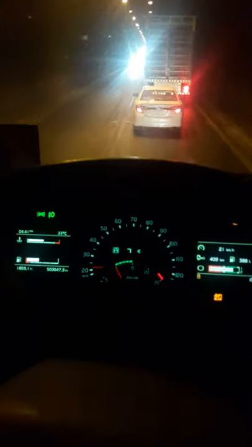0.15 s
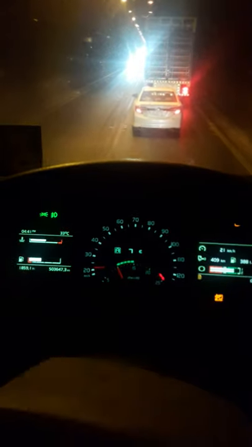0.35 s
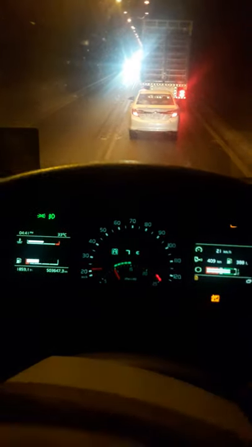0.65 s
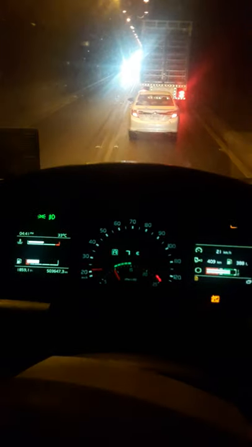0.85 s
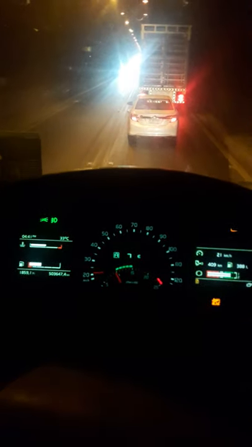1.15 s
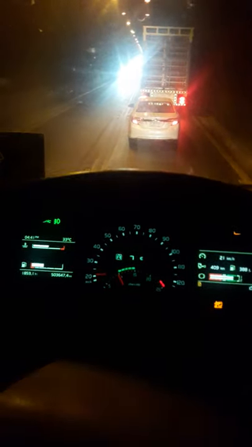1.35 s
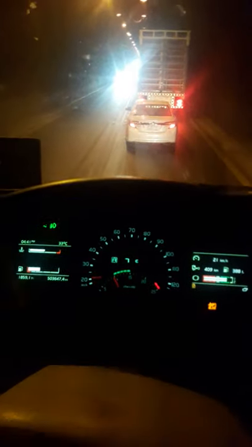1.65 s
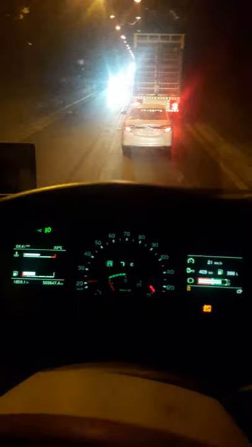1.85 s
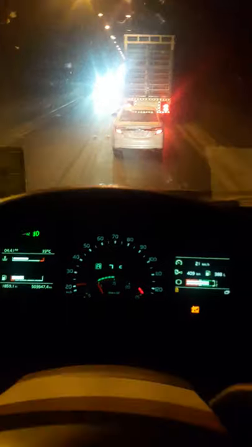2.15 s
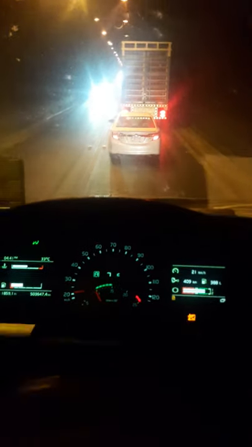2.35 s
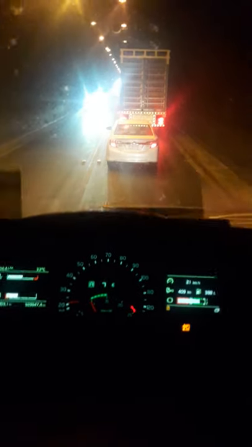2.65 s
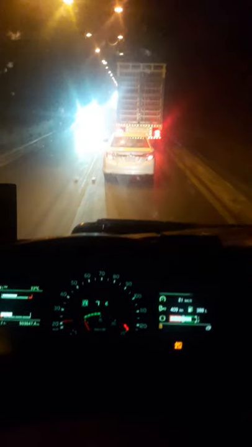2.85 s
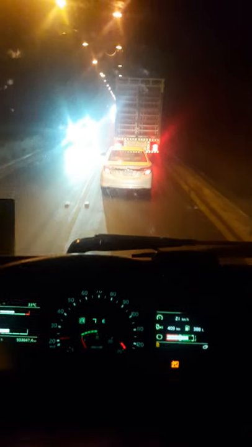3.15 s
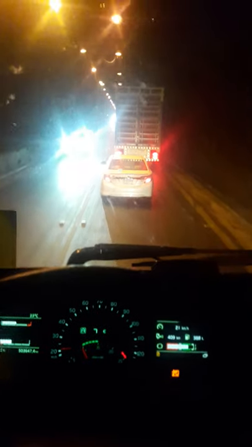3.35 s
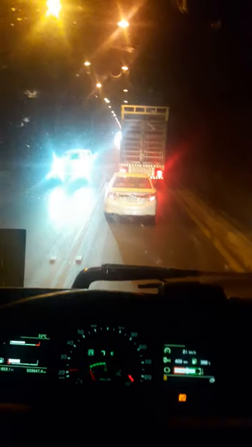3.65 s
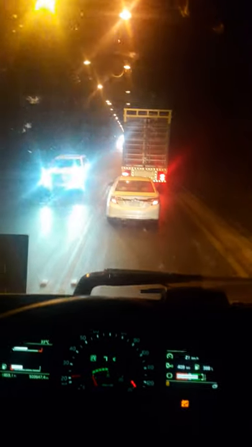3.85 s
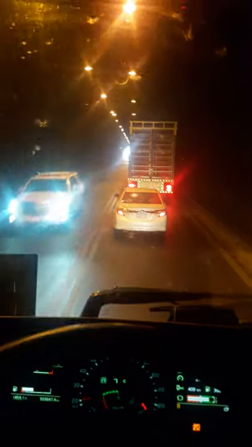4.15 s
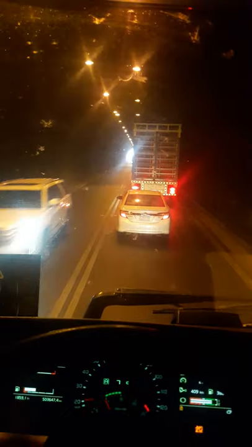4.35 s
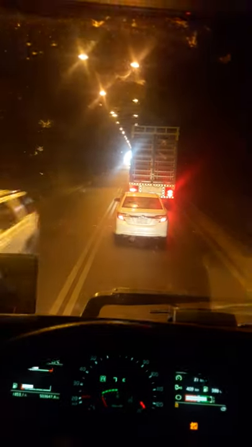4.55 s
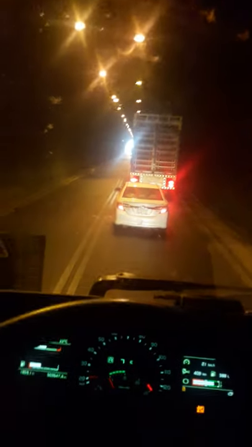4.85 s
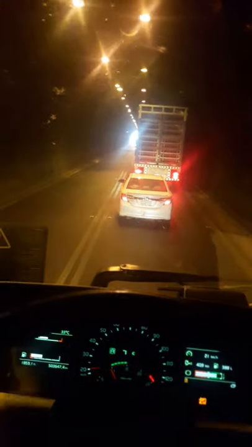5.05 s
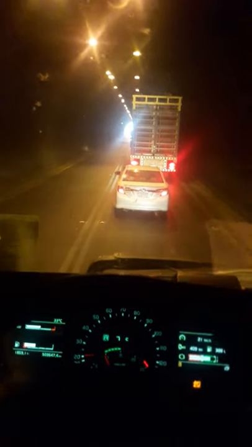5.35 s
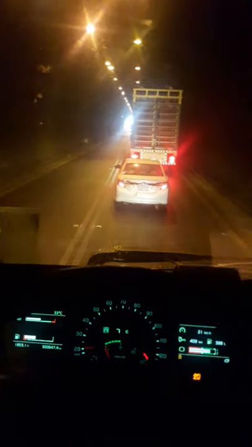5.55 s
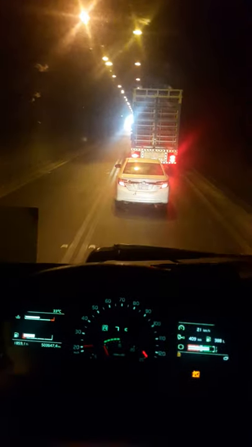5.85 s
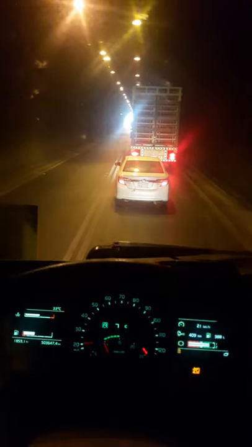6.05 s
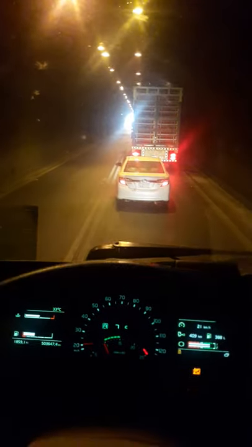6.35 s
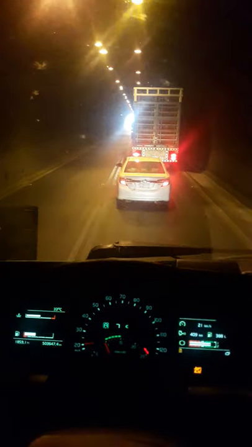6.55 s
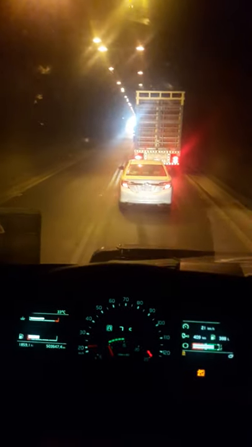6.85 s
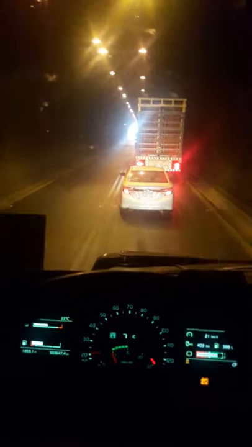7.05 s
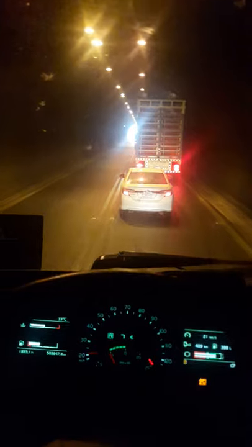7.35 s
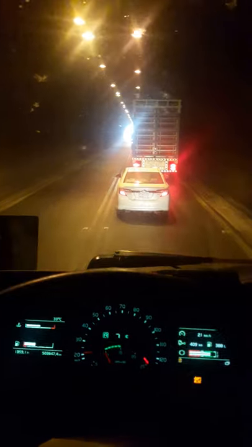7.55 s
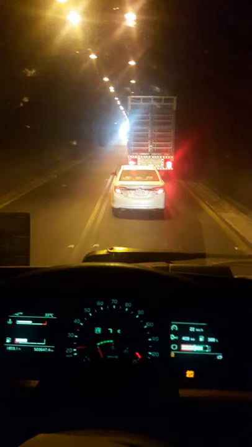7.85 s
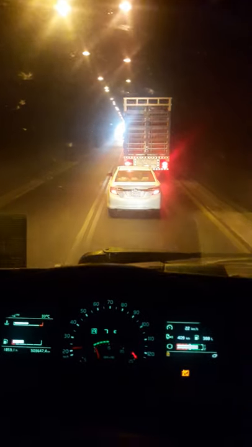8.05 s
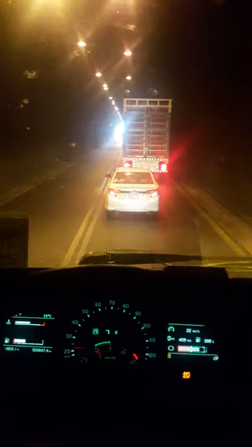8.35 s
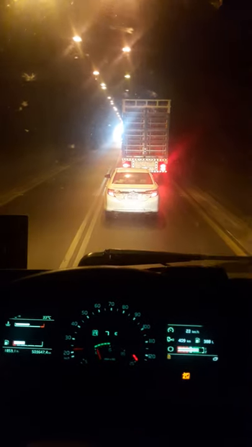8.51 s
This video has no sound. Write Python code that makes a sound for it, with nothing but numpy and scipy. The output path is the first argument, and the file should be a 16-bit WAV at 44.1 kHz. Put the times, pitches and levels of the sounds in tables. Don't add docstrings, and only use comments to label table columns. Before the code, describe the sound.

Deep heavy truck engine hum with road rumble and soft air hiss in the cab, briefly quieter on smooth road, then revving up.

```python
import sys
import numpy as np
from scipy import signal
from scipy.fft import rfft, irfft, next_fast_len
from scipy.io import wavfile
from scipy.ndimage import uniform_filter1d

SR = 44100
rng = np.random.default_rng(int(sys.argv[2]) if len(sys.argv) > 2 else 0)


def amplitude_ratio(level_db):
    exponent = np.asarray(level_db, float) / 20
    return 10 ** exponent


def generate_wav(signal):
    frames = np.transpose(np.atleast_2d(signal))
    scaled = np.clip(frames, -1, 1) * 32767
    pcm = np.round(scaled).astype(np.int16)
    wavfile.write(sys.argv[1], SR, pcm)


N = 382788
T = np.arange(N) / SR
SIZE = next_fast_len(N)
HZ = np.maximum(np.arange(SIZE // 2 + 1) * SR / SIZE, 1)

SMOOTH_FROM_S, SMOOTH_TO_S, DROP_S, RETURN_S = 6.07, 7.35, .005, .035
SMOOTH_DB = -9
TONES_FEEL = 0.94
GEARED_FEELS = 0.83


def level(x, db):
    return x * amplitude_ratio(db) / np.sqrt(np.mean(x ** 2))


def curves(*tables):
    s, *columns = np.vstack(tables).T
    return [np.interp(T, s, column) for column in columns]


def over_hz(table, hz):
    at, value = np.transpose(table)
    return np.interp(np.log(hz), np.log(at), value)


def humps(modes):
    return sum(db / (1 + (2 * (HZ - hz) / width) ** 2) for hz, width, db in modes)


def walk(rate):
    hold = int(SR / rate)
    steps = np.repeat(rng.standard_normal(N // hold + 1), hold)
    return 1.344 * uniform_filter1d(uniform_filter1d(steps, hold), hold)[:N]


def ramp(at_s, length_s):
    return np.clip((T - at_s) / length_s + .5, 0, 1)


def swell(at_s, length_s, db):
    return db * np.exp(-((T - at_s) / length_s) ** 2)


def smooth():
    return ramp(SMOOTH_FROM_S, DROP_S) - ramp(SMOOTH_TO_S, RETURN_S)


def surface_db():
    since = T - SMOOTH_FROM_S
    joint = 1 * np.exp(np.minimum(since, 0) / .05) * (since < 0)
    hang = -18 * np.exp(-np.maximum(since, 0) / .1)
    coarse_patch = swell(2.6, 1.7, 2)
    rougher_after = 1.6 * ramp(SMOOTH_TO_S, RETURN_S)
    return -28.3 + coarse_patch + joint + smooth() * (SMOOTH_DB + hang) + rougher_after


def ports(mid, side, hz):
    # (frequency [Hz], left-right correlation [-1 to 1])
    likeness = [(60, 0.78), (100, 0.88), (180, 0.88), (300, 0.8), (520, 0.57), (890, 0.32), (1520, -0.42),
                (2600, 0.24)]
    # (frequency [Hz], left minus right [dB])
    balance = [(60, -5.5), (91, -3.5), (140, -0.5), (210, -5.5), (320, -3), (490, -2), (740, -2),
               (1130, -2.5), (1710, -5.5), (2600, 0.5)]
    like = np.clip(over_hz(likeness + [(3500, -.12), (5000, -0.042)], hz), -.95, .999)
    lean = over_hz(balance + [(5000, -1.5), (9000, 1.7), (14000, .7)], hz) / 2
    shared = np.sqrt((1 + like) / 2) * mid
    differing = np.sqrt((1 - like) / 2) * side
    return np.array([(shared + differing) * amplitude_ratio(lean), (shared - differing) * amplitude_ratio(-lean)])


def airy(shape_db, top_hz, swell_db, flicker_db):
    white = rfft(rng.standard_normal((2, SIZE)))
    both = ports(white[0], white[1], HZ) * amplitude_ratio(shape_db)
    together = swell_db * walk(0.98)
    out = 0
    for centre in np.arange(9, 2 * np.log2(top_hz) + 1):
        window = np.cos(np.pi / 2 * np.clip(2 * np.log2(HZ) - centre, -1, 1)) ** 2
        band = irfft(both * window, SIZE)[:, :N]
        out = out + band * amplitude_ratio(together + flicker_db * walk(12))
    return out


def tone(hz, db, wobble_db, blur):
    phase = 2 * np.pi * np.cumsum(hz) / SR + blur * walk(9) + rng.uniform(0, 2 * np.pi)
    size = np.sqrt(2) * amplitude_ratio(db + wobble_db * walk(12))
    return ports(size * np.sin(phase), .3 * size * np.cos(phase), np.median(hz))


def breath(hz, db, width_hz, flicker_db):
    lowpass = signal.butter(2, width_hz / 2, fs=SR, output="sos")
    slow = signal.sosfilt(lowpass, rng.standard_normal((2, 2, N)))
    phase = 2 * np.pi * np.cumsum(hz) / SR
    band = slow[0] * np.sin(phase) + slow[1] * np.cos(phase)
    mid, side = level(band, 0) * amplitude_ratio(db + flicker_db * walk(6.2))
    return ports(mid, side, np.median(hz))


def rattles(events, lo_hz, hi_hz, knocks_s, decay_s):
    out = np.zeros((2, N + SR))
    t = np.arange(SR // 8) / SR
    shape = sum((t >= k) * np.exp(-np.maximum(t - k, 0) / decay_s) for k in knocks_s)
    band = signal.butter(2, [lo_hz, hi_hz], "band", fs=SR, output="sos")
    for (s, db, pan_db), noise in zip(events, rng.standard_normal((len(events), 2, len(t)))):
        burst = level(signal.sosfilt(band, noise), db) * shape
        start = int(s * SR)
        out[:, start:start + len(t)] += burst * amplitude_ratio(np.array([[pan_db], [-pan_db]]) / 2)
    return out[:, :N]


def engine(hz, boom_db):
    # (cycles per crank turn, level against the rumble [dB])
    orders = [(3, -20), (4.5, -15), (5, -16), (7, -15), (7.5, -15), (9, -18), (15, -20), (18, -22)]
    boom = tone(hz, boom_db + TONES_FEEL * SMOOTH_DB * smooth(), wobble_db=1.2, blur=0.18)
    frame_db = surface_db() + .6 * np.maximum(hz - 101, 0)
    return boom + sum(tone(hz * order / 6, frame_db + db, wobble_db=4.5, blur=.65) for order, db in orders)


def geared(hz, rest_db, loud_s, swell_s, swell_db, feels=GEARED_FEELS):
    drift_db = 1.5 * walk(2.479)
    db = rest_db + swell(loud_s, swell_s, swell_db) + drift_db + feels * SMOOTH_DB * smooth()
    return tone(hz * (1 + .004 * walk(1.5)), db, wobble_db=1.5, blur=0.27)


def driveline():
    # (time [s], mesh rate [Hz])
    mesh = [(0, 217.5), (1.1, 215.9), (3.1, 221.4), (5.7, 215), (7.3, 219.3), (8.3, 226.8), (8.68, 228.1)]
    # (turns against the mesh [ratio], resting level [dB], loudest time [s], swell length [s], swell [dB])
    parts = [
        (.909, -46, 4.0, 1.2, 12),
        (1, -37.5, 2.9, 1.3, 5.5),
        (1.083, -43, 3.1, 1.0, 11),
    ]
    # (time [s], pitch [Hz], level [dB])
    whine = [(.15, 1249, -66), (.3, 1255, -52), (.7, 1295, -52), (.97, 1306, -44.5), (1.32, 1292, -44),
             (1.45, 1306, -50), (1.8, 1310, -64), (2.0, 1310, -80), (8.35, 1298, -78), (8.46, 1300, -50),
             (8.68, 1300, -50)]
    mesh_hz = curves(mesh)[0]
    out = sum(geared(mesh_hz * turns, *shape) for turns, *shape in parts)
    out = out + geared(59.96 + .8 * T, rest_db=-39.5, loud_s=5.7, swell_s=0.42, swell_db=7)

    lift_s = 4.8
    axle_hz = 164.9 + 1.1 * np.minimum(T, lift_s) - 7.5 * ramp(lift_s, 0.5)
    out = out + geared(axle_hz, rest_db=-38, loud_s=4.2, swell_s=1.6, swell_db=5, feels=.3)

    panel_db = -52.5 + swell(0.91, 0.77, 6)
    out = out + breath(np.full(N, 664.6), panel_db, width_hz=25, flicker_db=2)

    hum_from_s, attack_s = 7.75, 0.17
    hum = tone(np.full(N, 98.4), -32 + 4.5 * (T - hum_from_s), wobble_db=2.5, blur=0.27)
    out = out + hum * ramp(hum_from_s + attack_s, attack_s)

    whine_hz, whine_db = curves(whine)
    core = tone(whine_hz, whine_db, wobble_db=1.1, blur=.6) * amplitude_ratio(.3)
    hoarse = breath(whine_hz, whine_db, width_hz=60, flicker_db=1.2) * amplitude_ratio(-4)
    return out + core + hoarse


def road():
    # (frequency [Hz], level per Hz [dB])
    rumble = [(15, -44), (25, -27.5), (71, -4), (97, -3), (141, -2.5), (226, -7), (418, -12.5),
              (700, -22.5), (910, -56.5), (1540, -120)]
    # (frequency [Hz], width [Hz], gain [dB])
    cab_modes = [(79.4, 25, 3), (96.7, 3.9, 6), (169, 26, 4.5), (331.6, 73, 4.5)]
    shape_db = over_hz(rumble, HZ) + humps(cab_modes)
    noise = airy(shape_db, top_hz=700, swell_db=-1.14, flicker_db=-1.0)
    return level(noise, 0) * amplitude_ratio(surface_db())


def hiss(hz):
    # (frequency [Hz], level per Hz [dB])
    spectrum = [(25, -38.5), (60, -17.5), (110, -14.5), (250, -13.5), (500, -18.5), (900, -17.5),
                (1500, -24), (2400, -31), (3250, -42.5), (3700, -46.5), (5200, -52), (7200, -59.5),
                (9900, -63), (12000, -58.5), (16000, -58.5)]
    # (frequency [Hz], width [Hz], gain [dB])
    panels = [(1037, 17, 2.5), (2680, 400, 2.5), (542, 45, 4.5), (673, 12, 3.5), (832, 58, 3),
              (2160, 460, 3.5), (8500, 230, 5), (12800, 1800, -1)]
    firing = 1 + .05 * np.sin(np.pi * np.cumsum(hz) / SR)
    air = airy(over_hz(spectrum, HZ) + humps(panels), top_hz=16000, swell_db=0.38, flicker_db=0.5)
    gust_db = swell(2.3, .7, 1.1)
    return level(air * firing, 0) * amplitude_ratio(-35.5 + 0.1038 * T + gust_db)


def turbo():
    # (time [s], boost [0-1])
    effort = [(0, 0), (1.8, .55), (2.8, .6), (3.6, .3), (5.4, .15), (6.3, .8), (6.6, .45), (7, 1),
              (7.4, .7), (8.68, .85)]
    boost = curves(effort)[0]
    hz = 4220 + 201.7 * boost
    db = -76.5 + 12.5 * boost
    strand = tone(hz * (1 + .015 * walk(6)), db - 10, wobble_db=4, blur=1.5)
    return breath(hz, db, width_hz=440, flicker_db=1.3) + strand


def clock():
    # (level [dB], left minus right [dB])
    sizes = [(-67, -2), (-61, -1), (-66, 0), (-61.5, 2), (-59.5, 2), (-57, 3), (-57.5, 3), (-58.5, 0)]
    first_s, every_s = .666, 1
    ticks = [(first_s + k * every_s, db, pan_db) for k, (db, pan_db) in enumerate(sizes)]
    return rattles(ticks, lo_hz=3950, hi_hz=4800, knocks_s=[0, .01, .02, .032], decay_s=.011)


def trim_snaps():
    # (time [s], level [dB], left minus right [dB])
    events = [
        (1.37, -72, 1),
        (3.32, -71, 0),
        (4.29, -66, 0),
        (6.09, -68, -3),
        (6.58, -71, 0),
        (7.85, -68, -1),
    ]
    return rattles(events, lo_hz=9500, hi_hz=14500, knocks_s=[0, .01], decay_s=.01)


def trim_creak():
    # (time [s], level [dB], left minus right [dB])
    events = [
        (5.114, -58, 0),
    ]
    return rattles(events, lo_hz=2500, hi_hz=7000, knocks_s=[0, .005, .014], decay_s=.008)


def scene():
    # (time [s], twice the firing rate [Hz], boom level on rough road [dB])
    engine_run = [(0.0, 100.5, -20.5), (0.5, 99.25, -24.5), (1.25, 98.2, -28.5), (1.5, 98.4, -25),
                  (2.4, 99.6, -25.5), (3.0, 99.87, -26.5), (4.1, 98.3, -26.5), (4.8, 97.4, -29.5),
                  (5.5, 96.23, -32.5), (6.3, 96.86, -34), (6.65, 98.8, -23.5), (7.3, 100.8, -21.5),
                  (7.42, 102.2, -19), (7.75, 104.4, -18.5), (8.05, 106.3, -24), (8.45, 109.7, -31.5),
                  (8.68, 112.2, -28.5)]
    hz, boom_db = curves(engine_run)
    running = engine(hz, boom_db) + driveline() + road() + hiss(hz) + turbo()
    return running + clock() + trim_snaps() + trim_creak()


def top_cut(x):
    return signal.sosfilt(signal.butter(12, 15755, fs=SR, output="sos"), x)


def record(dry):
    delay_s = np.array([[0], [.00007]])
    late = np.exp(-2j * np.pi * np.minimum(HZ, 900) * delay_s)
    heard = irfft(rfft(dry, SIZE) * late, SIZE)[:, :N]
    return top_cut(heard)


dry = scene()
out = record(dry)
generate_wav(out)
```